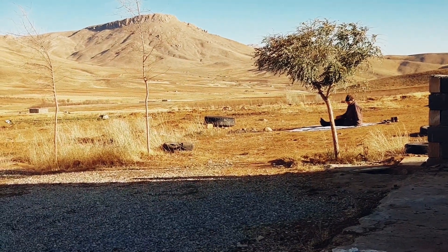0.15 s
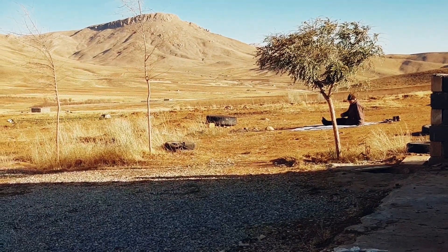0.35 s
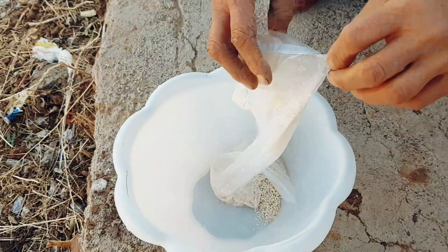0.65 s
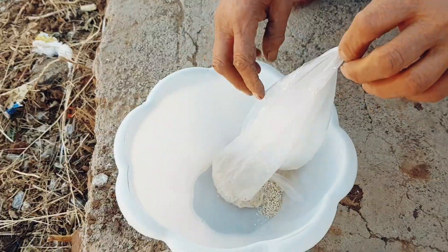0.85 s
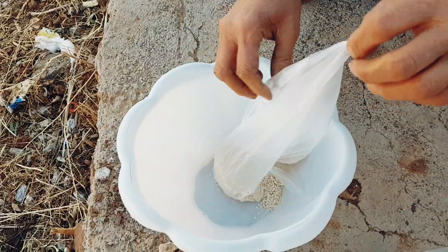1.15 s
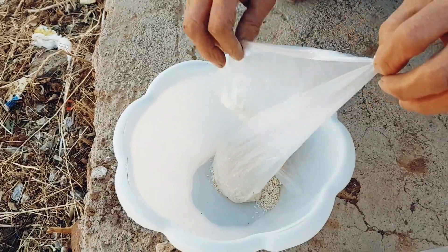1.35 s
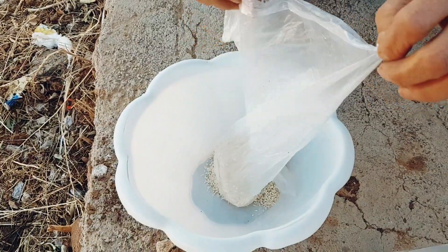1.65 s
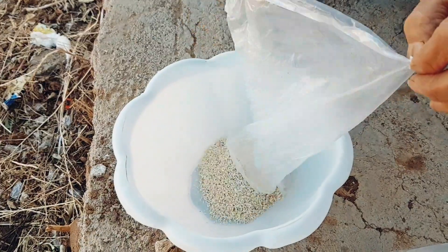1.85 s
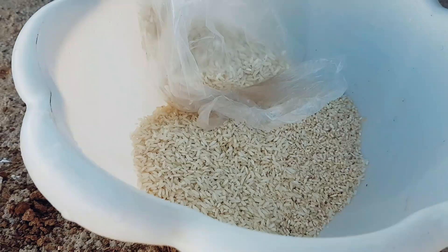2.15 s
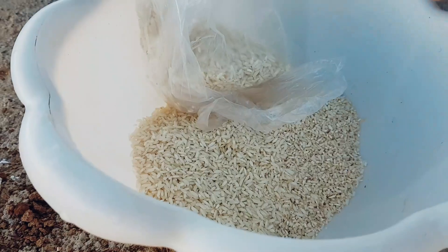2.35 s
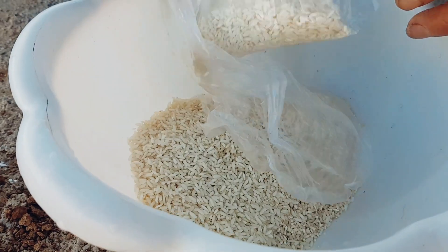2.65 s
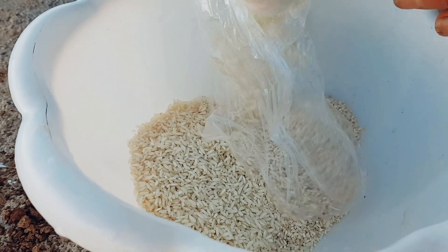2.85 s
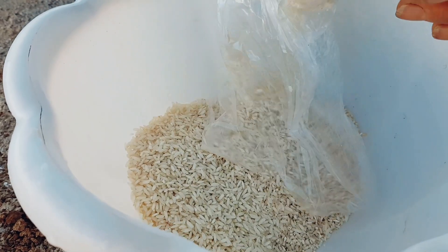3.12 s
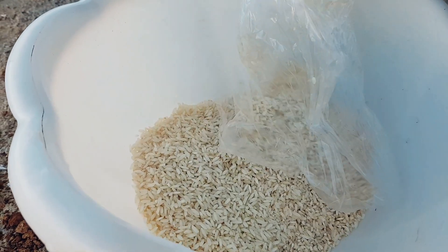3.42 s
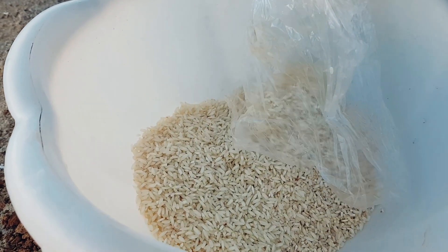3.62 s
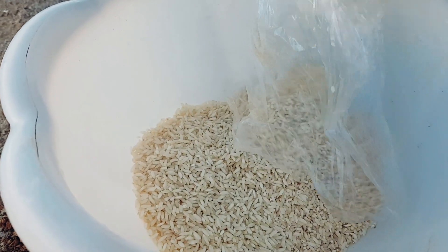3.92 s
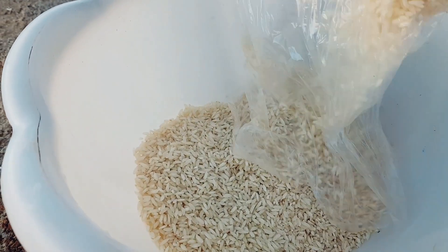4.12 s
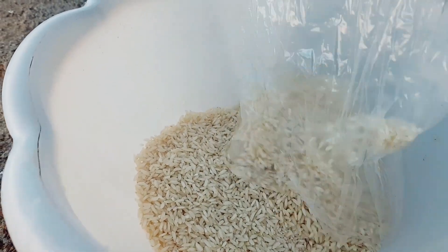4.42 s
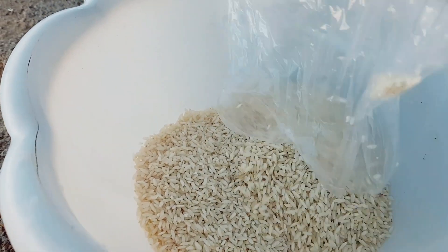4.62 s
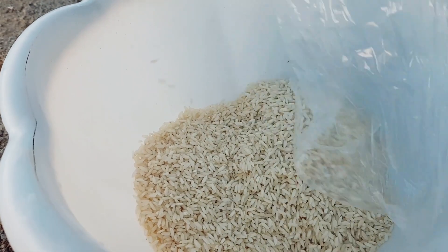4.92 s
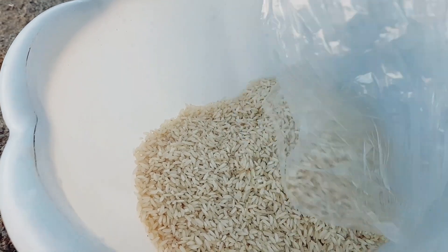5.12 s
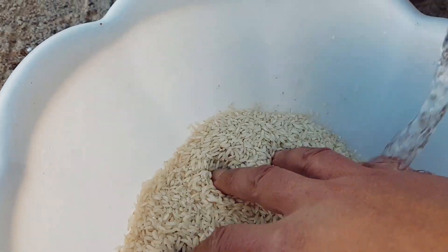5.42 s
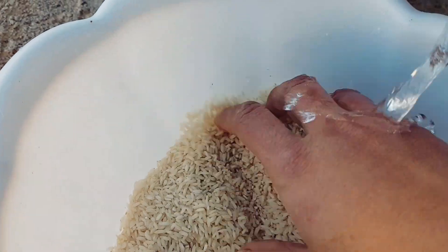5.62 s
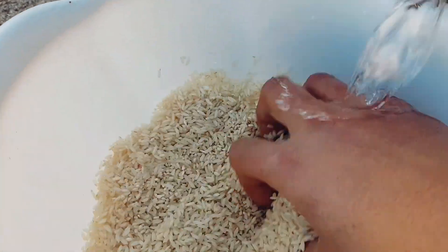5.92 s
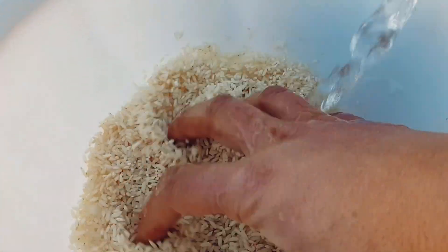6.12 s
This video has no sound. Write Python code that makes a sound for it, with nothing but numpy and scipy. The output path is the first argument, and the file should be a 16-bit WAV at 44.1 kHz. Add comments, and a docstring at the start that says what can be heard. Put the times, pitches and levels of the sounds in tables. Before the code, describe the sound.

A phone's stereo microphone, close up with no echo. Deep uneven wind rumble, mostly on the left, stops abruptly; then a quiet sheltered yard. Fine grain hiss comes in several gentle lifts, followed by a fuller rice pour with pattering and snapping plastic film. Five rapid bag shakes end it. A hand then rubs and digs in the rice as water splatters, gurgles and fizzes, knocking lightly on the basin.

```python
"""Outdoors, first in the open and then in a sheltered yard, wind buffets the two ports of a phone's microphone.
After a moment of silence dry rice slides out of a thin plastic bag, heard dry and without echo:
a fine hiss of grain ticks, then clumps pattering in a plastic basin while the film crinkles and is shaken.
At the end a hand stirs the rice under a thin stream of water: more grain ticks, with damped sines
for small bubbles and knocks. Wind and soft thumps are filtered noise under an envelope of low buffets."""
import sys
import numpy as np
from scipy import signal
from scipy.fft import rfft, irfft, next_fast_len
from scipy.io import wavfile
from scipy.ndimage import uniform_filter1d

SR = 44100
rng = np.random.default_rng(int(sys.argv[2]) if len(sys.argv) > 2 else 0)


def generate_wav(sig):
    """Save sig (samples, or channels by samples) to the path in sys.argv[1] as 16-bit PCM at SR."""
    pcm = np.round(np.clip(np.atleast_2d(sig).T, -1, 1) * 32767).astype(np.int16)
    wavfile.write(sys.argv[1], SR, pcm)


N = 276462

# the four parts of the scene (start_s, end_s); the yard spans the last three
OPEN_S, TRICKLE_S, POUR_S, STIR_S = (0, .482), (.534, 2.18), (2.18, 5.155), (5.155, 6.3)
YARD_S = (TRICKLE_S[0], STIR_S[1])


def undb(db):
    """Decibels to gain."""
    return 10 ** (np.asarray(db) / 20)


def clock():
    """Time of every sample in seconds."""
    return np.arange(N) / SR


def during(span):
    """1 within a part of the scene and 0 outside it, with soft edges."""
    inside = (clock() >= span[0]) & (clock() < span[1])
    return uniform_filter1d(1. * inside, size=128).clip(0, 1)


def add(out, s, sound):
    """Mix a sound in at time s."""
    start = max(int(s * SR), 0)
    part = sound[:max(N - start, 0)]
    out[start:start + len(part)] += part


def colour(x, points):
    """Minimum-phase filter through (pitch_hz, level_db) points, so that clicks ring only after their onset."""
    hz, db = np.transpose(points)
    size = next_fast_len(N // 2 + 8192, True) * 2
    bin_hz = np.arange(size // 2 + 1) * SR / size
    log_gain = np.interp(np.log(bin_hz + 1), np.log(hz), np.log(undb(db)))
    # folding the cepstrum onto positive time makes the filter causal
    cepstrum = irfft(log_gain)[:size // 2]
    cepstrum[1:] *= 2
    response = np.exp(rfft(cepstrum, size))
    return irfft(rfft(x, size) * response)[..., :N]


def unit(pair):
    """Scale a stereo pair so that its middle has rms 1."""
    return pair / np.std(pair.mean(axis=0))


# responses of the two microphone ports (pitch_hz, level_db)
LEFT_PORT = [(200, 5.5), (1500, 2), (2250, 1), (3000, -1), (6500, 0), (8000, -1.5), (9000, 5.5),
             (9700, 7.5), (11200, 2.5), (16000, -0.5)]
RIGHT_PORT = [(200, 1), (700, -2), (1100, -2), (1650, 0), (2400, -7.5), (3200, -5), (4600, -4), (6300, 2),
              (7200, -4.5), (8300, -13.5), (10000, -11.5), (12300, -4.5), (16000, -14.5)]
PORT_LAG_S = .00015  # scale of the random delays between the ports


def through_ports(left, right):
    """Colour each side by the response of its own microphone port."""
    return np.array([colour(left, LEFT_PORT), colour(right, RIGHT_PORT)])


def impacts(rate, spread_db):
    """Sizes of impacts that come at random moments, rate a second."""
    sizes = undb(spread_db * np.clip(rng.standard_normal(N), -2, 2))
    return (rng.random(N) < rate / SR) * sizes


def grains(rate, spread_db, body):
    """Grain ticks ringing a body; each has its own direction and so reaches the right port at its own lag."""
    left = impacts(rate, spread_db) * rng.choice([-1, 1], N)
    lag = np.rint(PORT_LAG_S * SR * rng.standard_normal(N)).astype(int)
    right = np.bincount((np.arange(N) + lag) % N, left, N)
    return unit(colour(through_ports(left, right), body))


def avalanches(share, rate, spread_db, decay_s):
    """Gain of a flow that sticks and slips: each slip frees a clump of grains that dies away."""
    slip_power = impacts(rate, spread_db) ** 2
    power = signal.lfilter([1], [1, -np.exp(-1 / (decay_s * SR))], slip_power)
    return np.sqrt(1 - share + share * power / power.mean())


# a thin flow moves in clumps up to this share (0-1); well above the level it runs evenly
CLUMP_SHARE, EVEN_FLOW_DB = 0.54, -40.5


def clumping(flow):
    """Share of the flow that moves in clumps: the thinner it runs, the more it sticks."""
    return CLUMP_SHARE / (1 + (flow / undb(EVEN_FLOW_DB)) ** 2)


def surges(table, attack_s, release_s=None, lag_s=0):
    """Two gain curves of moves that rise, hold and die away; the second curve comes lag_s later."""
    power = np.zeros((2, N))
    # the rest of a row is [release_s,] level_db, level_db
    for s, hold, *rest in table:
        age = np.maximum(clock() - s - np.array([[0], [lag_s]]), 0)
        rise = 1 - np.exp(-age / attack_s)
        fade = np.exp(-np.clip((age - hold) / (release_s or rest[0]), 0, 20))
        power += (undb(rest[-2:])[:, None] * rise * fade) ** 2
    return np.sqrt(power)


def swells(table, rise):
    """Envelope of short rushes that rise fast (rise is a share of their length) and fade over their length."""
    out = np.zeros(N)
    for s, db, length in table:
        age = np.arange(SR // 5) / SR / length
        add(out, s, undb(db) * (1 - np.exp(-age / rise)) * np.exp(-age ** 2 / 2))
    return out


def ring(hz, t60, rise_s, glide=0):
    """A damped sine in a soft-start envelope of peak 1; its pitch climbs by the share glide within t60."""
    t = np.arange(int(t60 * SR) + 2) / SR
    pitch = hz * (1 + glide * t / t60)
    envelope = undb(-60 * t / t60) * (1 - np.exp(-t / rise_s))
    return np.sin(2 * np.pi * np.cumsum(pitch) / SR) * envelope / envelope.max()


def pings(rate, low_hz, high_hz, cycles, spread_db, glide):
    """Random tiny resonators, each with its own pitch, size and port lag, ringing about the given cycles."""
    left, right = np.zeros(N), np.zeros(N)
    for when, pitch, size, life, side in rng.random((int(rate * N / SR), 5)):
        s = when * N / SR
        hz = low_hz * (high_hz / low_hz) ** pitch
        t60 = cycles * (.5 + life) / hz
        ping = undb(spread_db * size ** 2) * ring(hz, t60, rise_s=1 / hz, glide=glide)
        add(left, s, ping)
        add(right, s + PORT_LAG_S * 2 * (2 * side - 1), ping)
    return unit(through_ports(left, right))


def eddies(spectrum, shared):
    """Low turbulence of even strength on each port, partly in common."""
    pair = colour(rng.standard_normal((2, N)) + shared * rng.standard_normal(N), spectrum)
    return pair / np.sqrt(uniform_filter1d(pair ** 2, size=2600))


# spectra of the hiss in the open and of the dull air of the yard (pitch_hz, level_db)
AIR_COLOUR = [(200, 19), (700, -3), (1500, -5.5), (5000, -12), (8000, -23), (11000, -4), (16000, -1)]
YARD_COLOUR = [(100, -2.5), (250, 0.5), (500, -19.5), (1000, -24), (3000, -16), (12000, -11)]


def background(hiss_db, yard_db):
    """Faint noise hiss under the opening wind, and duller noise, partly common to both ports, in the yard."""
    hiss = unit(colour(rng.standard_normal((2, N)), AIR_COLOUR))
    yard = unit(colour(rng.standard_normal((2, N)) + rng.standard_normal(N), YARD_COLOUR))
    return undb(hiss_db) * during(OPEN_S) * hiss + undb(yard_db) * during(YARD_S) * yard


# spectra of the wind at the ports in the open and in the yard (pitch_hz, level_db)
OPEN_WIND_COLOUR = [(12, -36), (22, -29), (40, -2.5), (60, 0.5), (95, -7.5), (145, -16.5), (220, -31),
                    (320, -40), (500, -54), (1300, -74.5)]
YARD_WIND_COLOUR = [(15, -28), (40, -5), (60, 4.5), (98, -2.5), (150, -16.5), (300, -32), (600, -47),
                    (1300, -84)]
# low buffets and soft thumps: wind gusts, and at the end probably thumps of the hand
# (peak_s, half_length_s, relative level_db, left_minus_right_db)
BUFFETS = [(0.02, 0.056, -37.5, 8), (0.105, 0.024, -43, 12), (0.186, 0.019, -39.5, 8),
           (0.301, 0.012, -33.5, 21), (.43, 0.027, -43, 0), (1.01, 0.064, -52, 9), (1.79, 0.077, -55, 2.5),
           (1.95, 0.028, -41.5, -9), (2.052, 0.041, -47, -2), (2.506, 0.03, -34.5, 18),
           (2.606, 0.037, -44, 25), (2.73, 0.011, -39, 28), (3.044, .025, -52, 20), (3.225, 0.02, -51.5, 3),
           (4.104, 0.039, -46.5, 6), (4.876, 0.025, -37, -18), (5.19, 0.015, -37.5, -15),
           (5.272, 0.027, -39.5, 0), (6.004, 0.019, -43, 1), (6.125, 0.017, -39, -1)]
# steady wind in each place: relative level, and left minus right
OPEN_WIND_DB, OPEN_LEAN_DB, YARD_WIND_DB, YARD_LEAN_DB = -43, 19, -68, -0.5


def wind_and_thumps():
    """A steady breeze, strong in the open and weak in the yard, with bell-shaped low buffets and soft thumps."""
    def port_power(db, lean_db):
        sides = undb(np.array([[lean_db], [0]])) ** 2
        return 2 * undb(db) ** 2 * sides / sides.sum()

    buffets = sum(port_power(db, lean) * np.exp(-((clock() - s) / length) ** 2)
                  for s, length, db, lean in BUFFETS)
    open_gain = undb(3.5) * np.sqrt(buffets + port_power(OPEN_WIND_DB, OPEN_LEAN_DB))
    yard_gain = undb(2.5) * np.sqrt(buffets + port_power(YARD_WIND_DB, YARD_LEAN_DB))
    exposed = open_gain * eddies(OPEN_WIND_COLOUR, shared=0.24)
    sheltered = yard_gain * eddies(YARD_WIND_COLOUR, shared=.99)
    return during(OPEN_S) * exposed + during(YARD_S) * sheltered


# dull taps (start_s, pitch_hz, relative peak_db)
TAPS = [(0.024, 700, -40), (.097, 696, -48), (0.139, 650, -43.5), (0.375, 650, -41.5), (2.393, 600, -35),
        (2.558, 600, -19), (3.029, 596, -19), (5.633, 520, -31), (6.237, 480, -44)]


def taps():
    """Dull taps: sines that die within a cycle or two."""
    out = np.zeros(N)
    for s, hz, db in TAPS:
        add(out, s, undb(db) * ring(hz, t60=0.0034, rise_s=0.00087))
    return out


# knocks on the basin (start_s, relative peak_db)
KNOCKS = [(5.637, -28), (5.755, -26), (6.086, -37), (6.147, -28), (6.1893, -18.5), (6.216, -29.5),
          (6.238, -21)]
# modes of the plastic basin (pitch_hz, relative level_db, t60_s)
BASIN_MODES = [(403, -11.5, 0.029), (554, -6, 0.046), (650, -3, 0.013), (870, -9, 0.023),
               (1750, -9.5, 0.017)]


def knocks():
    """The hand knocks on the basin: each knock rings all its modes as damped sines."""
    out = np.zeros(N)
    for s, db in KNOCKS:
        for hz, mode_db, t60 in BASIN_MODES:
            add(out, s, undb(db + mode_db) * ring(hz, t60, rise_s=0.00067))
    return out


# single bubbles (start_s, pitch_hz, relative peak_db, t60_s)
BUBBLES = [(5.184, 4750, -38, .007), (5.1972, 4530, -25, 0.0021), (5.231, 1180, -29, 0.0056),
           (5.495, 1720, -28.5, 0.02), (5.583, 1390, -22, 0.013), (5.598, 3970, -24, 0.01),
           (5.633, 1130, -16.5, 0.0076), (5.889, 1710, -25, 0.01), (5.9679, 3700, -26.5, 0.011),
           (6.07, 3800, -30.5, 0.014), (6.189, 3110, -13, 0.0035), (6.236, 1000, -21.5, 0.013),
           (6.259, 3800, -27, 0.0083)]


def bubbles():
    """Bubbles, quickly damped by the rice: short sines that rise in pitch."""
    out = np.zeros(N)
    for s, hz, db, t60 in BUBBLES:
        add(out, s, undb(db) * ring(hz, t60, rise_s=0.00062, glide=0.15))
    return out


# fingers digging into the heap (start_s, relative level_db, length_s)
SCOOPS = [(5.392, -41, 0.0028), (5.652, -26.5, 0.019), (5.803, -44, .0022), (6.188, -26, 0.0036)]
# strokes of the hand (start_s, hold_s, release_s, relative rub level_db, relative water and basin level_db)
STROKES = [(5.335, 0.081, 0.11, -55, -69), (5.385, 0.24, 0.13, -45, -56.5),
           (5.615, 0.013, 0.032, -40, -40.5), (5.67, 0.1, .03, -45, -50.5),
           (5.738, 0.015, 0.12, -32.5, -45), (5.87, 0.058, 0.036, -50, -47.5),
           (6.03, 0.232, .05, -44.5, -49)]
# spectra of grains rubbing, and of water and basin (pitch_hz, level_db)
STIR_RUB = [(300, -12.5), (1900, -4), (2550, -6), (3050, -4), (3600, 0), (5000, -2.5), (7000, -7),
            (9500, -5.5), (13000, -9), (15500, -8)]
STIR_WATER = [(90, -8), (200, -3), (380, -10), (560, 4.5), (760, -9.5), (1200, -1.5), (1800, -2),
              (2500, -4), (3600, -6), (6000, -15), (12000, -38)]
STROKE_ATTACK_S = 0.0086
RESTING_RUB_DB, RESTING_WATER_DB = -59, -62.5  # relative levels between strokes
GURGLE_DB, FIZZ_DB = -3.5, -9  # large bubbles against the water, small ones against the rub


def stir():
    """Fingers push grains over each other while a thin stream of water splatters, gurgles and fizzes."""
    resting = undb([[RESTING_RUB_DB], [RESTING_WATER_DB]])
    rub, water = during(STIR_S) * np.hypot(resting, surges(STROKES, STROKE_ATTACK_S))
    slips = avalanches(clumping(rub), rate=150, spread_db=3.5, decay_s=.003)
    digging = undb(-2.5) * swells(SCOOPS, rise=0.13)
    fingers = np.hypot(undb(0.5) * rub * slips, digging) * grains(6000, 3.1, STIR_RUB)
    splatter = undb(2.0) * water * slips * grains(1100, 4.0, STIR_WATER)
    # large bubbles sound through the basin's resonances, small ones burst at the surface
    large = pings(rate=90, low_hz=450, high_hz=2000, cycles=18, spread_db=10, glide=.12)
    small = pings(rate=130, low_hz=3200, high_hz=6500, cycles=20, spread_db=9, glide=.2)
    gurgle = undb(GURGLE_DB) * water * unit(colour(large, STIR_WATER))
    fizz = undb(FIZZ_DB) * rub * small
    rumble = undb(-2.5) * water * eddies(YARD_WIND_COLOUR, shared=2.3)
    return fingers + splatter + gurgle + fizz + rumble


# crisp single snaps, mostly creases in the film (start_s, relative peak_db)
SNAPS = [(0.3743, -42), (2.807, -19), (2.827, -20), (2.913, -16.5), (3.034, -26), (3.083, -22), (3.13, -25),
         (3.2655, -20), (3.399, -31), (3.426, -24), (3.525, -22), (3.848, -25), (4.745, -14), (4.755, -30),
         (4.827, -12)]
# spectrum of the film, for snaps and for rice poured over it (pitch_hz, level_db)
POUR_SLIDE = [(150, -8), (500, -9), (1200, -8.5), (2200, -5), (2750, 2.5), (3500, -2), (4500, -1),
              (6200, -0.5), (9500, -1), (12000, -3), (15000, -5)]


def snaps(length_s, db):
    """Each snap is a burst of noise that dies within a millisecond or two, coloured by the film."""
    out = np.zeros((2, N))
    t = np.arange(SR // 200) / SR
    for s, peak_db in SNAPS:
        for channel in out:
            burst = rng.standard_normal(len(t)) * np.exp(-t / length_s)
            add(channel, s, undb(peak_db + db) * burst)
    return colour(through_ports(*out), POUR_SLIDE)


# lifts of the bag, each letting a little rice slide
# (start_s, hold_s, release_s, relative film slide level_db, relative basin landing level_db)
LIFTS = [(.522, 0.27, 0.12, -40.5, -53), (1.165, 0.061, .03, -50, -73), (1.235, 0.21, 0.065, -41.5, -60.5),
         (1.48, 0.17, 0.061, -40, -58.5), (1.695, 0.097, 0.11, -39.5, -54),
         (1.865, 0.05, 0.072, -37.5, -54)]
# spectra of rice sliding on the film and landing in the basin (pitch_hz, level_db)
TRICKLE_SLIDE = [(300, -39), (1200, -5.5), (2400, -3.5), (3200, 4), (4600, 0.5), (6500, 2), (10000, 2),
                 (15000, 4.5)]
TRICKLE_LAND = [(100, -7), (400, -9), (600, -4.5), (850, -2.5), (1120, 4), (1370, -7), (1850, 4),
                (2500, -8), (5000, -3.5), (12000, -35)]
LIFT_ATTACK_S, FALL_S = 0.022, 0.023


def trickle():
    """The bag is lifted: very many grains slide over the film and a few reach the basin floor."""
    slide, land = during(TRICKLE_S) * surges(LIFTS, LIFT_ATTACK_S, lag_s=FALL_S)
    hiss = undb(0.5) * slide * grains(14000, 4.6, TRICKLE_SLIDE)
    patter = undb(2.5) * land * grains(4000, 2.6, TRICKLE_LAND)
    return (hiss + patter) * avalanches(share=0.084, rate=460, spread_db=0, decay_s=0.0022)


# flow as the bag is tipped, eased and tipped fully
# (time_s, relative film slide level_db, relative basin landing level_db)
FLOW = [(2.19, -48, -57), (2.41, -54, -61.5), (2.47, -41, -48), (2.49, -42.5, -54), (2.56, -40, -51.5),
        (2.61, -43.5, -55.5), (2.97, -38.5, -50.5), (3.46, -47, -58.5), (3.74, -47, -56.5),
        (3.8, -51, -62.5), (3.99, -36, -45), (4.08, -32.5, -46), (4.23, -36, -39.5), (4.68, -44, -57)]
# shakes of the bag (start_s, hold_s, relative slide level_db, relative landing level_db)
SHAKES = [(2.176, 0.016, -48, -52), (2.445, 0.016, -43, -55), (2.535, 0.04, -42, -59),
          (4.7, 0.051, -30.5, -43), (4.785, 0.054, -33, -45), (4.885, 0.047, -33.5, -44),
          (4.98, 0.04, -34.5, -48), (5.055, 0.041, -32.5, -44)]
# short rustles of the film (start_s, relative level_db, length_s)
RUSTLES = [(1.173, -47, 0.0072), (1.2245, -43.5, 0.0056), (3.145, -40, .005), (3.222, -35, .006),
           (3.533, -38.5, 0.0032), (3.6195, -39.5, .0027), (4.559, -37.5, 0.023)]
# spectrum of rice landing on the heap and the basin (pitch_hz, level_db)
POUR_LAND = [(80, -8.5), (200, -7), (380, -4.5), (540, 0), (730, -8.5), (930, 1.5), (1130, 8.5), (1400, -1),
             (1680, -1.5), (2150, -6), (2800, -14), (5000, -18), (12000, -40)]
SHAKE_ATTACK_S, SHAKE_RELEASE_S = 0.0031, 0.058
CREASE_DB, FOLD_DB = -2.5, -9.5  # fine creases and larger folds, against the clumped part of the slide


def pour():
    """Rice leaves the bag in clumps and drums on heap and basin; creases in the film ring as the load shifts."""
    s, slide_db, land_db = np.transpose(FLOW)
    steady_slide = undb(np.interp(clock(), s, slide_db) + 1.0)
    steady_land = undb(np.interp(clock(), s, land_db) + 2.5)
    shaken = surges(SHAKES, SHAKE_ATTACK_S, SHAKE_RELEASE_S)
    slide, land = during(POUR_S) * np.hypot(np.array([steady_slide, steady_land]), shaken)
    # quick slips within slower surges
    slips = avalanches(clumping(slide), rate=220, spread_db=2, decay_s=.0014)
    surging = avalanches(clumping(slide), rate=130, spread_db=2.5, decay_s=0.0084)
    sliding = undb(-0.68) * slide * slips * surging
    film = np.hypot(sliding, swells(RUSTLES, rise=0.082)) * grains(8000, 3.1, POUR_SLIDE)
    creases = pings(rate=260, low_hz=2700, high_hz=14000, cycles=9, spread_db=12, glide=0)
    folds = pings(rate=110, low_hz=2550, high_hz=3600, cycles=14, spread_db=10, glide=0)
    crinkle = slide * clumping(slide) * (undb(CREASE_DB) * creases + undb(FOLD_DB) * folds)
    patter = undb(-2.0) * land * slips * grains(2000, 3.16, POUR_LAND)
    rumble = undb(-13.5) * land * eddies(YARD_WIND_COLOUR, shared=0.85)
    return film + crinkle + patter + rumble


def scene():
    """Wind throughout but for a brief silence, with rice trickling, then pouring, then being washed."""
    air = background(hiss_db=-67, yard_db=-65.0) + wind_and_thumps()
    # taps, knocks and bubbles lie mostly at the left port
    port_gains = undb([[-1.0], [-16.5]])
    struck = port_gains * (taps() + knocks() + bubbles())
    crackle = snaps(length_s=.0006, db=-1)
    return air + struck + stir() + crackle + trickle() + pour()


def record(dry):
    """The deepest rumble (below 27 Hz) and the top treble (above 15.9 kHz) are filtered out."""
    rumble_cut = signal.butter(3, 27, "high", fs=SR, output="sos")
    treble_cut = signal.ellip(12, .2, 70, 15900, fs=SR, output="sos")
    return signal.sosfilt(treble_cut, signal.sosfilt(rumble_cut, dry))


dry = scene()
out = record(dry)
generate_wav(out)
```